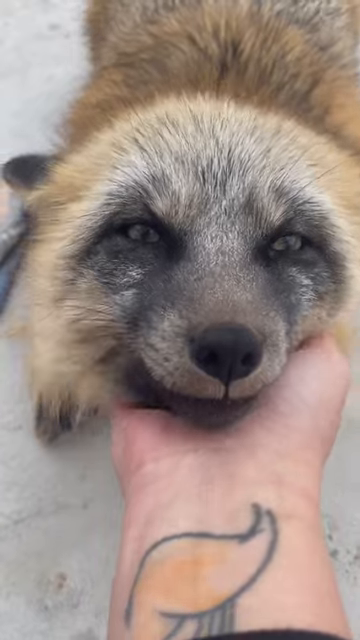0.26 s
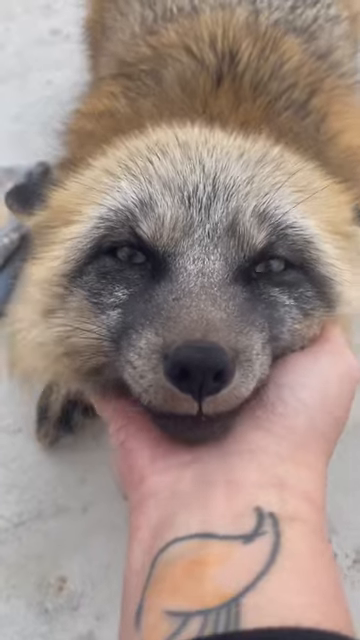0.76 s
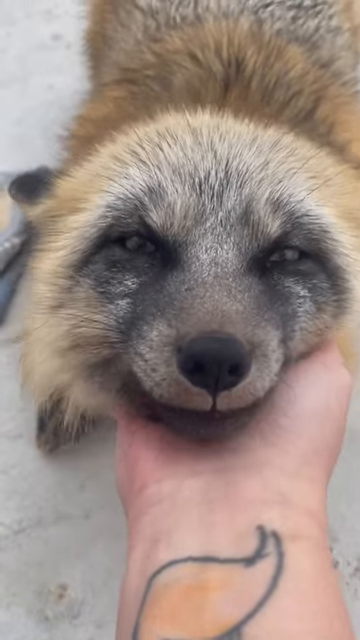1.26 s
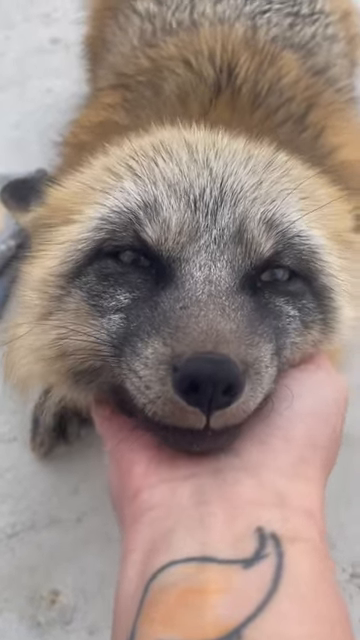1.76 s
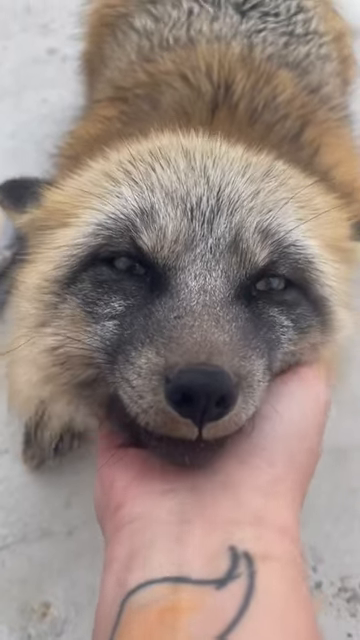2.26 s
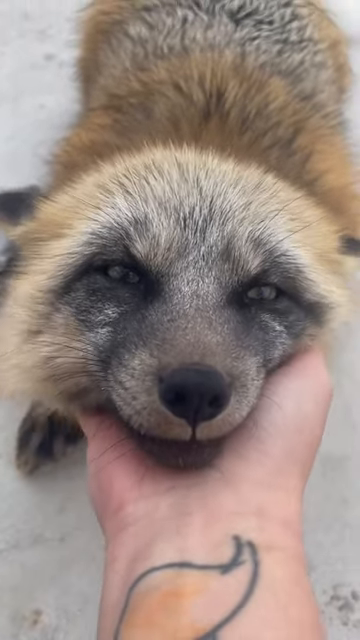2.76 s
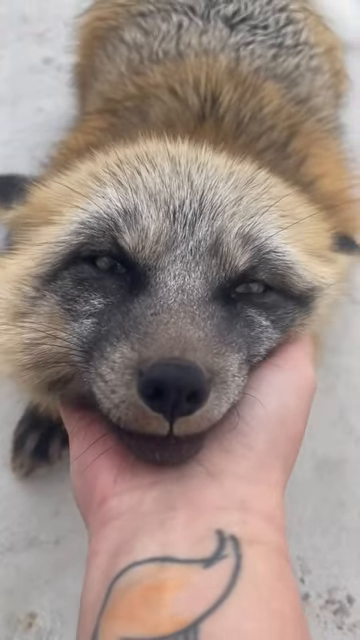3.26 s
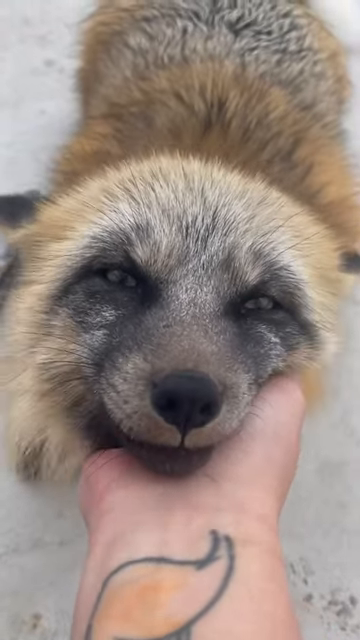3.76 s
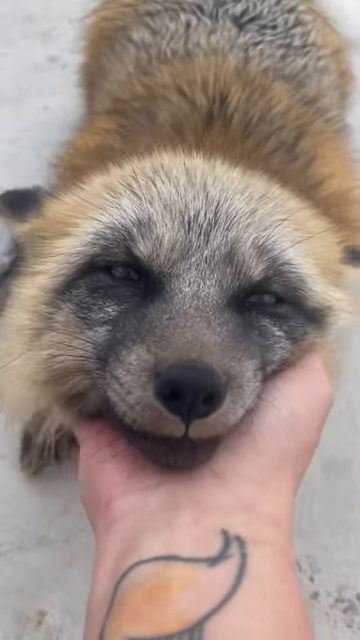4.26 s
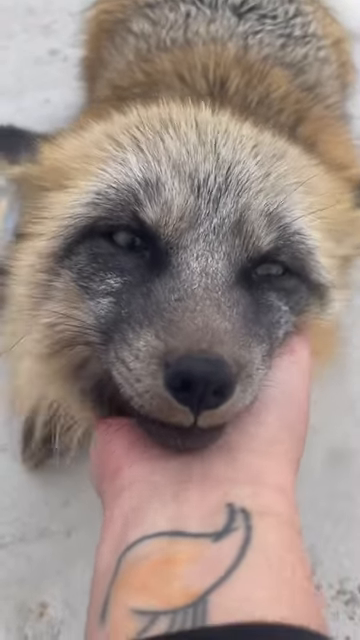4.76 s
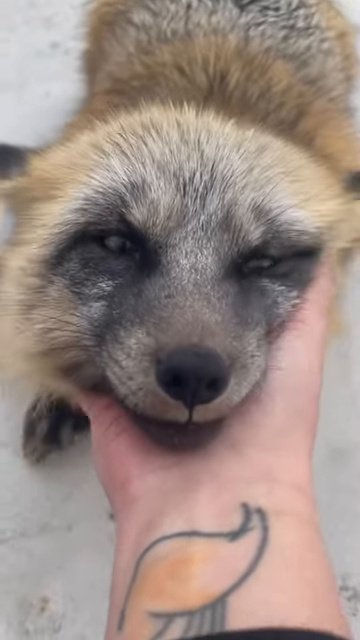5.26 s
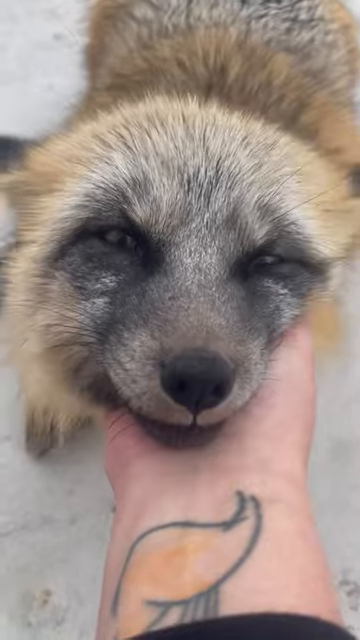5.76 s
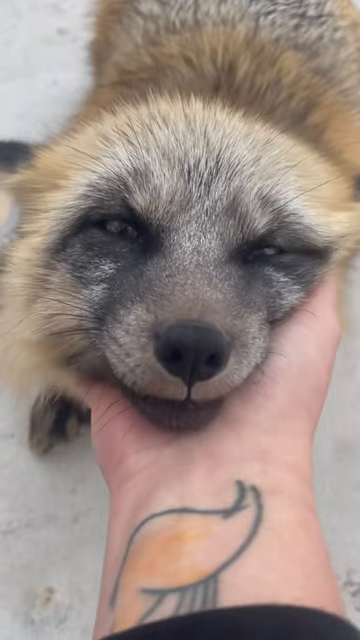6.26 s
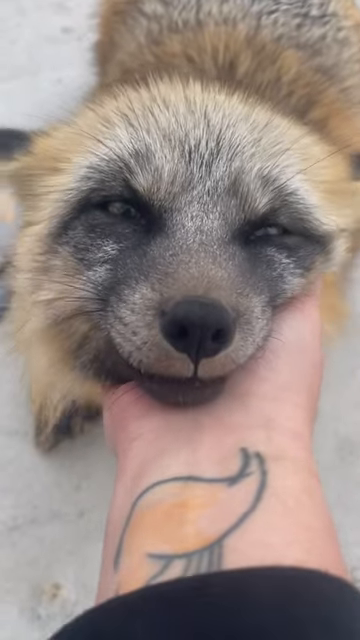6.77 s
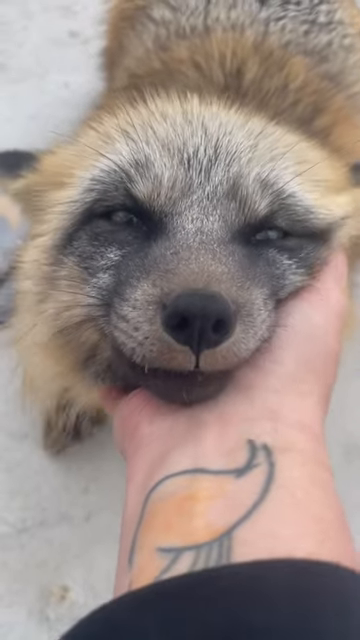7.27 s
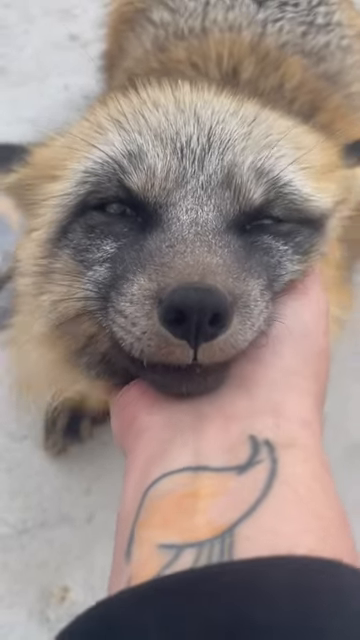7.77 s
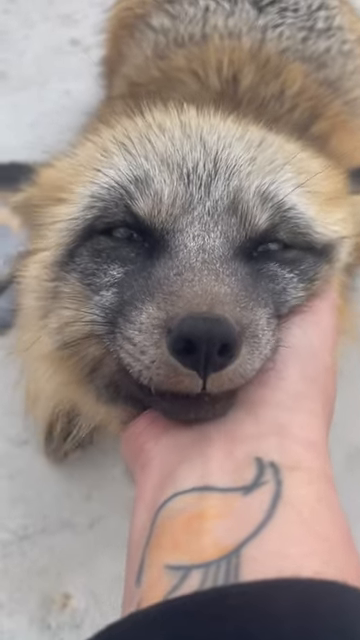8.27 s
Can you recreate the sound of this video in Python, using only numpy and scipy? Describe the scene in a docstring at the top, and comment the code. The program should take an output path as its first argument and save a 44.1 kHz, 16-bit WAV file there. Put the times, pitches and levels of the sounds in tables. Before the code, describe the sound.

Low, boomy handling rumble and a quiet open-air wash come first, with a faint distant tone and a soft tap on the phone case. Then a close fox whines hoarsely through mouth and nose, falling away at the end. A tiny peep precedes the second whine, a short sniff follows it, then comes a third sagging cry and the start of a steady high fourth. Lips tick softly; the yard adds barely any echo.

```python
"""Outdoors in a yard, a fox close in front of a hand-held phone with two microphone ports.
Handling rumble and faint open air run throughout; first come a faint tone and a soft tap on the case.
Then a pulsed larynx whines through mouth and nose from 0.6 s; the lips tick now and then from 1.8 s.
A tiny peep leads into the second whine (2.9 s), a breathy sniff follows at 4.3 s, the third whine at 5.6 s.
These three sag from about 900 Hz, rough and broken, and sink; the fourth (8.2 s) stays high to the end."""
import sys
import numpy as np
from scipy import signal
from scipy.fft import rfft, irfft
from scipy.io import wavfile
from scipy.ndimage import uniform_filter1d

SR = 44100
rng = np.random.default_rng(int(sys.argv[2]) if len(sys.argv) > 2 else 0)


def int16_out(signal):
    """Quantize to a 16-bit WAV file."""
    q = np.round(np.clip(np.atleast_2d(signal).T, -1, 1) * 32767)
    wavfile.write(sys.argv[1], SR, q.astype(np.int16))


N = 376173
T = np.arange(N) / SR  # time [s]
BINS = np.maximum(np.arange(N // 2 + 1) * SR / N, 1)  # frequency of each spectral bin [Hz]
TOP_HZ = 13600  # upper limit of the phone's band
# Levels in the tables are relative: the function below each one may trim or reshape them.


def undb(db):
    """Decibels to gain."""
    return 10 ** (np.asarray(db) / 20)


def curve(rows):
    """Each column of a table as a line through time."""
    s, *columns = np.transpose(rows)
    return [np.interp(T, s, column) for column in columns]


def at(points, hz):
    """Read a spectrum on a log-frequency axis."""
    f, value = np.transpose(points)
    return np.interp(np.log(hz), np.log(f), value)


def shape(x, gain):
    """Filter with a gain for every frequency."""
    return irfft(rfft(x) * gain, N)


def below(hz, order):
    """Gain of a smooth low-pass."""
    return 1 / (1 + (BINS / hz) ** order)


def unit(x):
    """Scale to rms 1."""
    return x / np.sqrt(np.mean(x ** 2))


def noise(gain):
    """Coloured noise of rms 1."""
    return unit(shape(rng.standard_normal(N), gain))


def wobble(hz, width_hz):
    """Random swaying around a rate."""
    return noise(np.exp(-.5 * ((BINS - hz) / width_hz) ** 2))


def drift(count):
    """Random levels, count of them a second, joined by lines; spread near 1."""
    knots = np.arange(0, T[-1] + 1, 1 / count)
    return np.interp(T, knots, rng.standard_normal(len(knots))) * np.sqrt(3 / 2)


def loudness(x, size=900):
    """Running rms over size samples."""
    return np.sqrt(np.abs(uniform_filter1d(x ** 2, size)) + 1e-12)


def steady(x, size=900):
    """Hold a sound near rms 1 from moment to moment."""
    return x / loudness(x, size)


def clicks(rows, decay_s, colour):
    """Short bursts of coloured noise that start at once and die away fast."""
    envelope = sum(undb(db) * (T >= s) * np.exp(-np.abs(T - s) / decay_s) for s, db in rows)
    return noise(colour) * envelope


# the two microphone ports: (frequency [Hz], lead of the left port [rad])
PORT_LEAD = [(20, 0), (3700, 0), (4400, 3.1), (4900, 3.5), (5500, 6.2), (6200, 6.5), (9050, 9.42),
             (10800, 10.6), (11700, 12.57)]


def ports(x):
    """Sound from the front reaches the two ports out of step in the treble."""
    return shape(x, np.exp(1j * at(PORT_LEAD, BINS) * np.array([[1], [0]])))


# spectrum of the handling rumble: (frequency [Hz], density [dB per Hz])
RUMBLE_SPECTRUM = [(18, -35), (32, -14.5), (58, -4.5), (80, -5.5), (110, -4.5), (135, -6), (168, -5),
                   (205, -8.5), (250, -18.5), (320, -26), (450, -28)]
# level of the rumble: (time [s], level [dB])
RUMBLE_LEVEL = [(0.05, -39.5), (1.2, -36.5), (3.2, -37), (5.6, -38.5), (7.0, -36), (7.6, -38.5),
                (8.5, -34.5)]
# lift of the rumble above 110 Hz: (time [s], lift [dB])
UPPER_RUMBLE_LIFT = [(0.2, -2), (1.2, 2), (2.3, 0.5), (3.0, 0), (4.1, 2.5), (5.0, 1.5), (6.0, -0.5),
                     (7.2, 1), (8.3, 2.5)]
# narrow boom near 80 Hz: (time [s], level [dB])
BOOM_LEVEL = [(0.5, -52), (1.1, -37), (1.4, -51), (1.6, -41.5), (2.5, -37.5), (3.7, -49), (5.1, -43.5),
              (6.2, -36.5), (7.6, -37.5), (8.3, -40.5)]


def rumble(rumble_db=-2, side_db=-21, boom_hz=81, boom_width_hz=8, boom_db=-1):
    """Handling shakes the whole phone, so both ports rumble nearly alike; a narrow boom swells within it."""
    colour = undb(at(RUMBLE_SPECTRUM, BINS)) * below(475, order=10)
    both = noise(colour) + undb(side_db) * noise(colour) * np.array([[1], [-1]])
    upper = shape(both, 1 - below(110, order=8))
    both = both + upper * (undb(curve(UPPER_RUMBLE_LIFT)[0]) - 1)
    boom = steady(wobble(boom_hz, boom_width_hz), size=11000) * undb(curve(BOOM_LEVEL)[0] + boom_db)
    return both * undb(curve(RUMBLE_LEVEL)[0] + rumble_db) + boom


# spectrum of the open air: (frequency [Hz], density [dB per Hz])
AIR_SPECTRUM = [(150, -31), (280, 9.5), (400, 7), (550, 7), (900, 6), (1400, -4.5), (2200, -6),
                (3500, -10.5), (5000, -15.5), (7000, -17), (9800, -9), (10700, -16), (11600, -68)]
# likeness of the air at the two ports: (frequency [Hz], likeness [0-1])
PORT_LIKENESS = [(250, 0.2), (500, 0), (1200, 0), (1800, 1), (2800, 0.21), (4500, 0.15), (6000, 1),
                 (7000, 1), (9200, 1), (11000, 0.88)]
# level of the open air: (time [s], level [dB])
AIR_LEVEL = [(0, -56.5), (1.8, -53.5), (2.7, -52), (4.6, -51.5), (7.0, -52), (8.53, -51)]
# faint hum: (time [s], level [dB])
HUM_LEVEL = [(1.2, -62.5), (4.5, -54.5), (7.0, -62), (8.53, -56.5)]


def air(hum_hz=384, upper_hum_hz=436, upper_hum_db=-3, hiss_db=-1, hiss_fade_db_per_s=1.38):
    """Distant outdoor wash of noise that sways a little, with a faint wavering hum of two narrow bands."""
    colour, likeness = undb(at(AIR_SPECTRUM, BINS)), np.clip(at(PORT_LIKENESS, BINS), 0, 1)
    mid = shape(rng.standard_normal(N), colour * np.sqrt(1 + likeness))
    side = shape(rng.standard_normal(N), colour * np.sqrt(1 - likeness))
    sway_db = .4 * wobble(2, 8)
    wash = unit(mid + side * np.array([[1], [-1]])) * undb(curve(AIR_LEVEL)[0] + sway_db)
    # its treble slowly dies down
    treble_db = hiss_db - hiss_fade_db_per_s * (T - T.mean())
    wash = wash + shape(wash, 1 - below(3000, order=6)) * (undb(treble_db) - 1)
    hum = wobble(hum_hz, 7.2) + undb(upper_hum_db) * wobble(upper_hum_hz, 19.5)
    hum = hum * undb(curve(HUM_LEVEL)[0])
    return ports(wash) + hum * np.array([[.4], [1.3]])  # the hum is stronger at the right port


def far_tone(middle_s=0.23, half_s=0.17, tone_hz=487, tone_db=-56):
    """A faint far-off tone, slightly unsteady in pitch, swells and fades before the first whine."""
    phase = 2 * np.pi * np.cumsum(tone_hz * (1 + 0.0057 * drift(count=12))) / SR
    swell = np.exp(-np.minimum(np.abs(T - middle_s) / half_s, 10) ** 4)
    return undb(tone_db) * np.sin(phase) * swell


# soft tap of the hand on the phone: (time [s], level [dB])
CASE_TAPS = [(0.383, -46.5)]


def taps():
    """A finger knocks softly on the case: a dull, very short burst."""
    return clicks(CASE_TAPS, decay_s=0.0012, colour=(1 - below(600, order=4)) * below(1800, order=2))


# the whines: (start [s], end [s], level [dB], level slope [dB/s], swell [s],
# lift of the upper mouth resonance [dB])
WHINE_ROWS = [(0.616, 1.6, -29, 1.6, 0.029, 1), (2.876, 4.061, -28.5, 0, 0.15, -1.5),
              (5.6, 6.765, -26, -3.5, 0.012, -3), (8.238, 8.54, -25, -16, 0.027, -3)]


def current_whine():
    """The columns of the whine under way, moment by moment."""
    rows = np.array(WHINE_ROWS)
    midway = (rows[1:, 0] + rows[:-1, 1]) / 2
    return rows[np.searchsorted(midway, T)].T


def gate(attack_s, release_s):
    """Opens for each whine and dies away after it."""
    return sum(np.clip((T - start) / attack_s + .5, 0, 1) * np.exp(-np.maximum(T - end, 0) / release_s)
               for start, end, *_ in WHINE_ROWS)


# breaks of the voice: (time [s], half length [s], pitch jump [%], dip of the fundamental [dB],
# flare of the mouth overtones [dB]); a negative dip is a rise, a negative flare a loss
VOICE_BREAKS = [(0.618, 0.006, 18, -1.5, 6), (0.799, 0.009, -9, 3, 2), (1.092, 0.01104, -3, 2, 3),
                (1.396, 0.007, -9, 0, 4.5), (1.526, 0.016, -0.5, 3, 2.5), (1.599, 0.0042, 5.5, 4, 0),
                (3.26, 0.009, 1, 4.5, 1), (3.622, 0.00692, 3.5, 3, 3), (3.995, 0.0076, -7, 2.5, 7.5),
                (4.016, 0.00246, 5.5, -2.5, 3), (5.608, 0.018, 9, 0.5, 3), (5.638, 0.008, 11.5, 11.5, 3),
                (5.71, 0.0193, -1, 3, 1.5), (5.986, 0.0092, 5, 9, 3.5), (6.328, 0.007, 9, 7, 3),
                (6.668, 0.00624, 7.5, 3.5, 4), (8.248, 0.011, 11, 2.5, 3), (8.356, 0.0102, 3.5, 8.5, -2)]
SNAP = 2.2  # at a break the pitch falls this many times faster than it climbs
DIP_SPREAD = 1.52  # dip and flare are wider than the climbing side of the pitch jump by this factor


def breaks():
    """The folds slip at each break: the pitch jumps, fundamental and overtones trade level."""
    jump = dip_db = flare_db = 0
    for s, half_s, percent, dip, flare in VOICE_BREAKS:
        away = np.minimum(((T - s) / half_s) ** 2, 60)
        falling = percent * (T - s) > 0
        jump = jump + percent / 100 * np.exp(-.5 * away * np.where(falling, SNAP ** 2, 1))
        bell = np.exp(-.5 * away / DIP_SPREAD ** 2)
        dip_db, flare_db = dip_db + dip * bell, flare_db + flare * bell
    return 1 + jump, dip_db, flare_db


# hoarseness, one list a whine: (time [s], roughness [about 0-1])
HOARSENESS_ARCS = [
    [(0.62, 0.3), (0.77, 0.46), (0.8, 0.7), (0.83, 0.31), (0.87, 0.43), (0.91, 0.83), (1.08, 0.77),
     (1.36, 0.69), (1.47, 0.59), (1.55, 0.33)],
    [(2.89, 0.16), (3.03, 0.42), (3.07, 0.68), (3.14, 0.51), (3.33, 0.49), (3.44, 0.9), (3.52, 0.5),
     (3.63, 0.88), (3.68, 0.9), (3.95, 1.01), (4.06, 0.64)],
    [(5.6, 0.31), (5.89, 0.24), (5.95, .42), (6.02, 0.24), (6.22, 0.33), (6.3, 0.4), (6.33, 0.8),
     (6.4, 0.72), (6.5, 0.77), (6.65, 0.79), (6.72, 0.36)],
    [(8.24, 0.04), (8.53, 0.07)],
]


def roughness(hz, crack=0.045, size=600):
    """The voice is rough when pressed, and cracks wherever its pitch jumps."""
    octaves_per_s = uniform_filter1d(np.abs(np.gradient(np.log2(hz))) * SR, size)
    cracking = crack * np.clip(octaves_per_s - 4, 0, 3)
    return np.clip(curve(np.vstack(HOARSENESS_ARCS))[0] + cracking, 0, 1.2)


def larynx(hz, rough, quaver=0.0018, pressed_quaver=0.004, clean_breath_db=-33):
    """Sharp pulses whose period flutters in random bouts when rough, with a puff of air in every cycle."""
    flutter = .027 * noise(below(205, order=9) * (1 - below(28, order=4))) * undb(1.5 * drift(count=25))
    hz = hz * (1 + rough ** 1.3 * flutter + (quaver + pressed_quaver * rough) * drift(count=45))
    phase = 2 * np.pi * np.cumsum(hz) / SR
    # the shape of the pulse keeps changing, so each overtone swells on its own, the high ones most
    pulses = 0
    for k in range(1, 22):
        swell_db = min(k - 1, 7) * .33 * drift(count=22)
        pulses = pulses + np.cos(k * phase) * (k * hz < TOP_HZ) * undb(swell_db)
    pulses = unit(pulses) * (1 + .06 * rough * drift(count=400))
    puffs = unit(rng.standard_normal(N) * (1 + np.cos(phase)) ** 2)
    return pulses, puffs * (undb(-24) * rough + undb(clean_breath_db))


def treble_hiss(stream, high):
    """The top overtones hiss in two treble bands, each with its own randomly drifting level."""
    split = below(9100, order=40)
    lower, upper = shape(stream, (1 - high) * split), shape(stream, 1 - split)
    lower_drift = undb(drift(count=14) + drift(count=60))
    upper_drift = undb(drift(count=14) + drift(count=60))
    return (lower * lower_drift + upper * upper_drift) / loudness(lower + upper)


def rattle(rough):
    """Air through the nose comes in uneven gusts and a fine rattle when the voice is rough."""
    return undb(rough * (drift(count=35) + 1.8 * drift(count=330)))


# arc of each whine, before the breaks: (time [s], pitch [Hz])
PITCH_ARCS = [
    [(0.615, 867.3), (0.76, 850.6), (0.82, 826), (0.88, 845), (0.97, 833), (1.0, 812), (1.07, 822),
     (1.11, 790), (1.19, 781), (1.265, 798), (1.305, 759.6), (1.335, 782.7), (1.385, 747.2), (1.415, 696.2),
     (1.455, 704.8), (1.48, 665.2), (1.509, 566), (1.595, 436), (1.601, 450), (1.607, 290)],
    [(2.885, 891.3), (2.98, 945), (3.031, 922), (3.037, 872), (3.075, 856), (3.11, 888), (3.16, 895),
     (3.215, 846), (3.26, 896), (3.268, 845), (3.32, 899), (3.37, 848.2), (3.43, 835), (3.47, 852),
     (3.59, 845), (3.66, 828), (3.7, 784), (3.77, 796.5), (3.85, 791), (3.92, 730), (3.974, 757.6),
     (3.982, 712), (4.02, 694), (4.065, 634.5)],
    [(5.598, 918), (5.726, 910.7), (5.8, 950), (5.84, 903.6), (5.89, 928.6), (5.945, 911), (5.982, 935),
     (5.987, 870), (6.01, 890), (6.07, 836), (6.14, 894), (6.18, 879), (6.205, 894), (6.29, 860),
     (6.35, 853), (6.4, 833.4), (6.47, 866), (6.58, 849), (6.685, 814), (6.77, 639)],
    [(8.238, 933), (8.29, 941), (8.33, 960), (8.43, 929.4), (8.53, 951)],
]
# throat and muzzle: (frequency [Hz], gain [dB])
THROAT_SPECTRUM = [(300, -33), (480, -8.5), (700, -4.5), (920, -2.5), (1300, -6.5), (1700, -0.5),
                   (1900, -6.5), (2100, -7), (2400, -5), (2680, -15), (2950, -9), (3300, -25), (3620, -34),
                   (3900, -43), (4400, -33.5), (4780, -18), (5200, -21.5), (5550, -21.5), (5800, -33),
                   (6150, -22.5), (6700, -30.5), (7500, -22.5), (8300, -5.5), (9100, -18.5), (9800, -11.5),
                   (10500, -21.5), (11400, -33), (12600, -75)]
# turbulent air in the muzzle: (frequency [Hz], gain [dB])
TURBULENCE_SPECTRUM = [(500, -9.5), (900, -6), (1250, -6), (1700, 6), (2050, 9.5), (2450, -5.5),
                       (2900, 10.5), (3600, -14), (4400, -48), (5200, -6.5), (6300, -26.5), (7300, 2.5),
                       (8300, 5), (9100, -29), (10000, 16.5), (10900, -31), (11500, -31), (13000, -42)]
# mouth and nose, one list a whine: (time [s], mouth overtones [dB], nose overtones [dB])
OPENING_ARCS = [
    [(0.615, -53.5, -46), (0.669, -37.5, -44), (0.825, -36.5, -42), (0.86, -51, -44.5), (0.959, -35, -41.5),
     (1.124, -36, -41.5), (1.158, -42, -39), (1.328, -34, -38), (1.46, -41.5, -44), (1.6, -52, -47.5)],
    [(2.885, -81, -83), (2.96, -70, -62), (3.025, -45, -53), (3.045, -37, -42), (3.305, -38, -42.5),
     (3.426, -33, -43), (3.6, -38.5, -42.5), (3.67, -38, -50.5), (3.772, -34, -40.5), (3.96, -39.5, -44),
     (4.065, -49.5, -49)],
    [(5.598, -53.5, -49), (5.646, -40.5, -52), (5.684, -60, -54), (5.75, -50.5, -49), (5.812, -46.5, -55.5),
     (6.073, -39, -48), (6.261, -36.5, -38.5), (6.367, -37.5, -51), (6.5, -37.5, -47), (6.68, -39.5, -52.5),
     (6.77, -46.5, -55)],
    [(8.238, -46, -51), (8.292, -46.5, -63), (8.377, -36, -55), (8.414, -46.5, -60), (8.467, -37, -54),
     (8.53, -45, -68)],
]
# treble, one list a whine: (time [s], lowest nasal resonance [dB], treble hiss [dB])
TREBLE_ARCS = [
    [(0.625, -54, -57), (0.69, -47, -44), (0.8, -51, -48), (0.885, -53, -53.5), (0.98, -50, -42.5),
     (1.08, -55, -44.5), (1.17, -45, -50), (1.3, -48.5, -38), (1.42, -48, -46), (1.5, -51, -49),
     (1.57, -56, -48), (1.6, -70, -49)],
    [(2.93, -81, -69), (3.042, -49.5, -52), (3.092, -46, -44.5), (3.27, -46, -47), (3.44, -42.5, -40.5),
     (3.548, -40, -43.5), (3.69, -47, -47.5), (3.774, -48, -36.5), (3.93, -47, -41), (4.01, -53, -46),
     (4.055, -58, -47.5)],
    [(5.605, -51, -54), (5.649, -52, -47), (5.7, -60, -49), (5.897, -45, -45), (6.073, -47.5, -45),
     (6.28, -41, -41.5), (6.373, -47, -44), (6.585, -42, -40), (6.69, -46, -41), (6.76, -60, -45.5)],
    [(8.245, -51, -48), (8.297, -50, -47.5), (8.365, -46, -43), (8.42, -58, -47.5), (8.51, -43, -41.5)],
]
# where the fundamental, two mouth and two nasal resonances end: (edge [Hz], steepness [filter order])
RESONANCE_EDGES = [(1100, 20), (1940, 20), (3780, 20), (5750, 50), (6900, 40)]
SWELL_DB_PER_S = 101  # how fast each whine swells at its start
SUNK_HZ, TAUT_HZ = 696.6, 698.3  # the folds are slack below the first pitch and taut above the second


def whines(hiss_db=3, slack_db=6, slack_fade_db=-2, rasp_db=1.5, open_db=-9, closing_tilt=0.26,
           sunk_db=13, nose_flare=0.25, nose_breath_db=3):
    """The larynx rings the throat; the mouth passes the low overtones and the nose the high ones."""
    start, _, level_db, slope_db, swell_s, lips_db = current_whine()
    age = np.clip(T - start, 0, 1.5)
    held_db = level_db + slope_db * age
    effort_db = held_db - SWELL_DB_PER_S * np.maximum(swell_s - age, 0)
    mouth_open_db, nose_open_db = curve(np.vstack(OPENING_ARCS))
    nasal_db, top_db = curve(np.vstack(TREBLE_ARCS))

    jump, dip_db, flare_db = breaks()
    hz = curve(np.vstack(PITCH_ARCS))[0] * jump
    rough = roughness(hz)
    slack = np.clip((TAUT_HZ - hz) / (TAUT_HZ - SUNK_HZ), 0, 1)
    pulses, puffs = larynx(hz, rough)
    # the folds stop almost at once, while air flows on through the nose for a moment
    voiced = gate(attack_s=0.009, release_s=0.0039)
    flowing = gate(attack_s=0.025, release_s=0.017)
    tone = shape(pulses * voiced, undb(at(THROAT_SPECTRUM, BINS)))
    breath = shape(puffs, undb(at(TURBULENCE_SPECTRUM, BINS)))
    voice = tone + breath

    low, lower, middle, nasal, high = (below(edge_hz, order=order) for edge_hz, order in RESONANCE_EDGES)
    body = steady(shape(voice, low)) * undb(effort_db - dip_db)

    # closing lips and a sinking pitch tip the mouth from its lower resonance to the upper one
    closing_db = closing_tilt * np.clip(open_db - mouth_open_db + held_db, 0, 20)
    sinking_db = slack * np.maximum(sunk_db - 3 * flare_db, 0)
    # the upper one rasps when the voice is rough
    upper_db = lips_db + closing_db + sinking_db + rasp_db * rough * drift(count=220)
    upper = shape(voice, middle - lower) * undb(upper_db)
    mouth = steady(shape(voice, lower - low) + upper) * undb(mouth_open_db + flare_db)

    # slack folds leak more air; the fluttering overtones sweep through two nasal resonances and the hiss
    stream = tone + breath * undb(nose_breath_db + slack_db * slack)
    ring = steady(shape(stream, nasal - middle)) * undb(nasal_db)
    nose = steady(shape(stream, high - nasal)) * undb(nose_open_db + nose_flare * flare_db)
    hiss = treble_hiss(stream, high) * undb(top_db + hiss_db)
    treble = (ring + nose + hiss) * rattle(rough) * undb(slack_fade_db * slack)
    return (body + mouth) * voiced + treble * flowing


# lip ticks: (time [s], level [dB])
LIP_TICKS = [(1.7933, -47), (2.8894, -54), (4.6354, -52), (5.0444, -56), (5.3714, -65), (7.0573, -48),
             (7.4524, -41.5), (7.76, -50), (8.107, -49)]


def ticks(tick_db=3):
    """Wet lips part with tiny bright clicks."""
    colour = (1 - below(4600, order=12)) * below(11100, order=20)
    return undb(tick_db) * clicks(LIP_TICKS, decay_s=0.0006, colour=colour)


def peep(start_s=2.762, peep_hz=950, decay_s=0.013, peep_db=-43):
    """A tiny false start of the voice before the second whine: a decaying sine."""
    age = np.maximum(T - start_s, 0)
    return undb(peep_db) * np.sin(2 * np.pi * peep_hz * age) * np.exp(-age / decay_s)


# muzzle as the fox draws air in: (frequency [Hz], width [Hz], gain [dB])
MUZZLE_MODES = [(825, 510, -8.5), (1550, 240, -1.5), (1990, 110, -5), (2370, 230, -11), (5600, 5000, -30.5)]
# the sniff: loudest moment, level there, and how fast it rises and falls
SNIFF_S, SNIFF_DB, SNIFF_RISE_DB_PER_S, SNIFF_FALL_DB_PER_S = 4.33, -46.5, 69, 85


def sniff():
    """Air drawn in through the resonant muzzle, without voice."""
    muzzle = sum(undb(db) / (1 + (2 * (BINS - hz) / width) ** 2) for hz, width, db in MUZZLE_MODES)
    fade_db = np.maximum(SNIFF_RISE_DB_PER_S * (SNIFF_S - T), SNIFF_FALL_DB_PER_S * (T - SNIFF_S))
    return noise(muzzle * below(10000, order=20)) * undb(SNIFF_DB - fade_db)


def yard(x, t60_s=0.28, wet_db=-24, size=12000):
    """Ground and nearby walls return a short, faint tail, different at each port."""
    tail = rng.standard_normal((2, size)) * np.exp(-np.log(1000) * T[:size] / t60_s)
    tail /= np.sqrt(np.sum(tail ** 2, axis=1, keepdims=True))
    return undb(wet_db) * signal.fftconvolve(x[None], tail, axes=1)[:, :N]


# balance of the fox between the ports: (frequency [Hz], left minus right [dB])
FOX_BALANCE = [(500, 4.5), (800, 3.5), (1500, -0.5), (2400, 3), (3400, -7), (4600, 5.5), (5200, -7.5),
               (5800, 0)]


def scene():
    """The fox just in front of the phone, over rumble and air."""
    fox = whines() + ticks() + peep() + sniff()
    direct = shape(ports(fox), undb(at(FOX_BALANCE, BINS) * np.array([[.5], [-.5]])))
    return rumble() + air() + far_tone() + taps() + direct + yard(fox)


def record(dry):
    """The phone cuts the top with a steep low-pass."""
    return signal.sosfilt(signal.ellip(8, .2, 70, TOP_HZ, fs=SR, output="sos"), dry)


dry = scene()
out = record(dry)
int16_out(out)
```